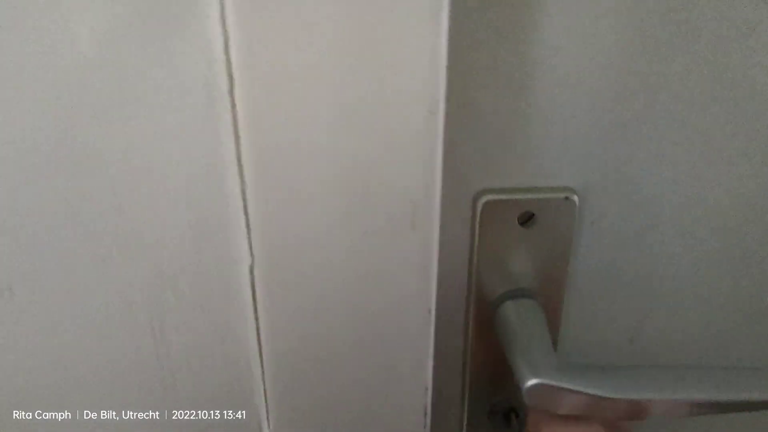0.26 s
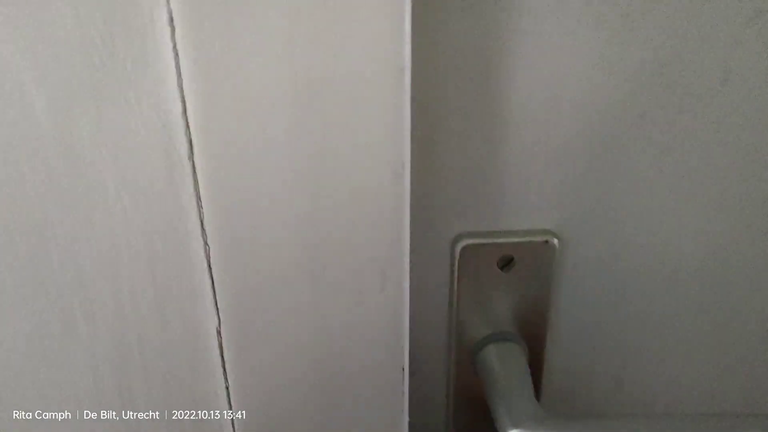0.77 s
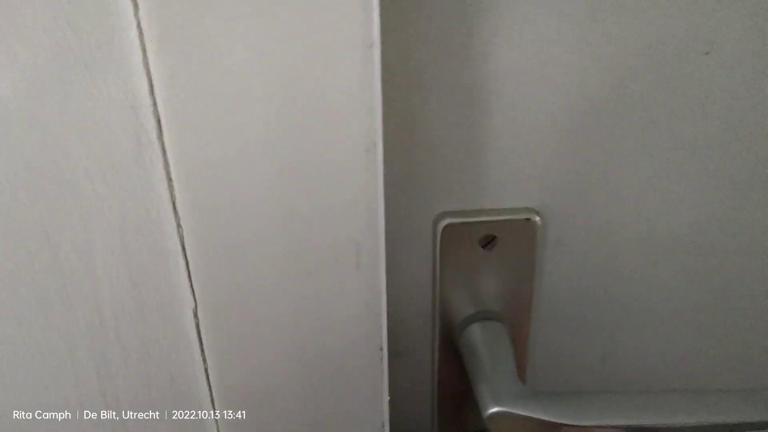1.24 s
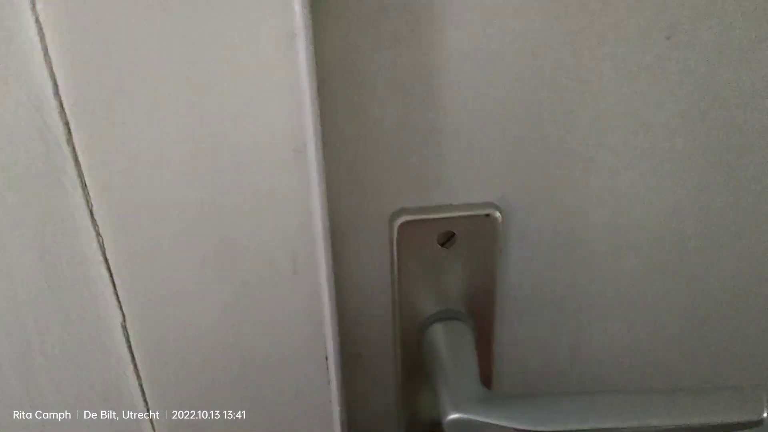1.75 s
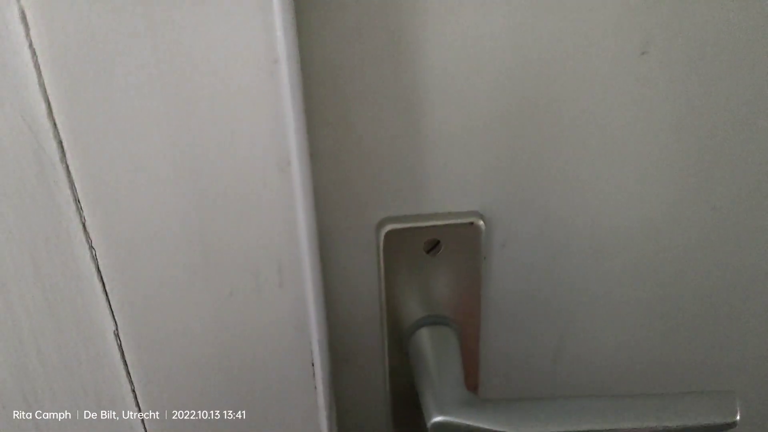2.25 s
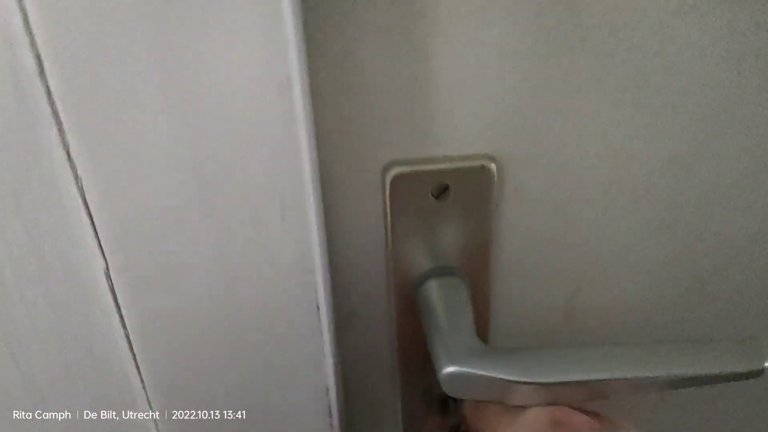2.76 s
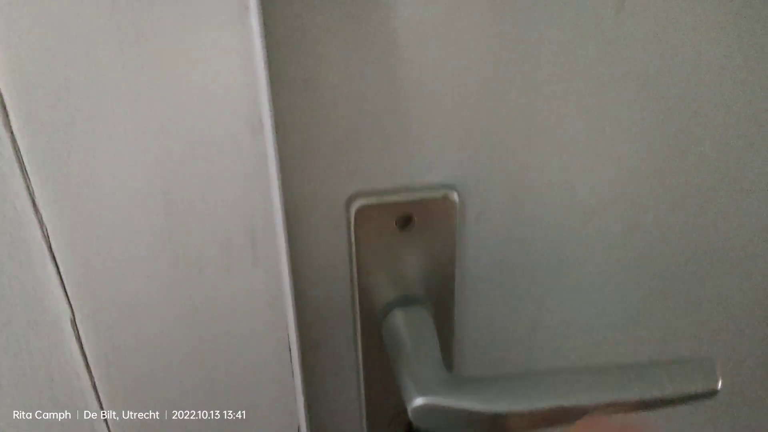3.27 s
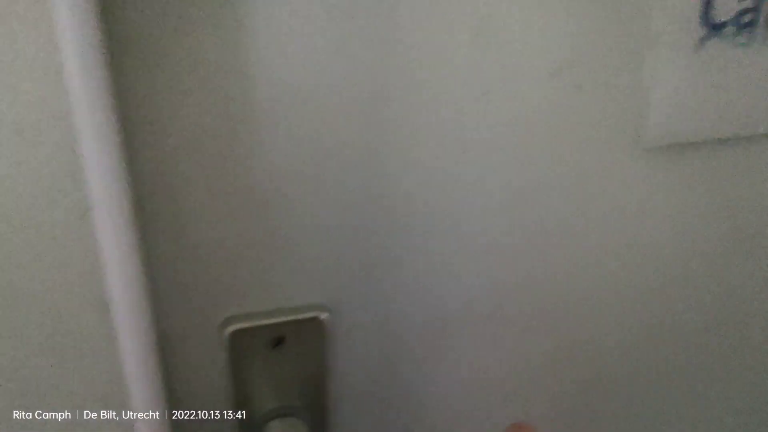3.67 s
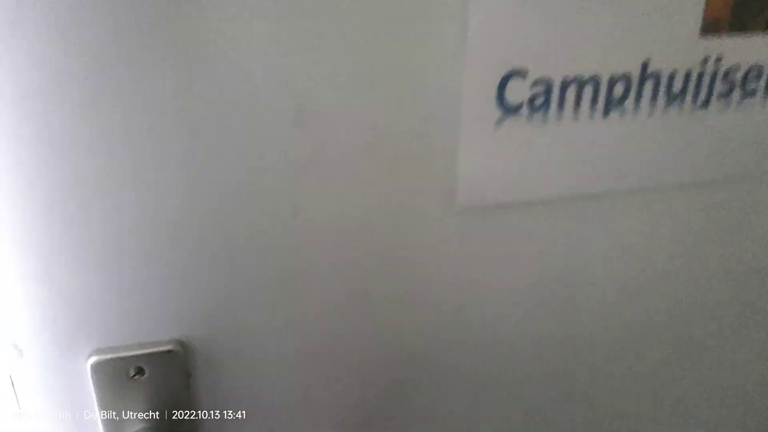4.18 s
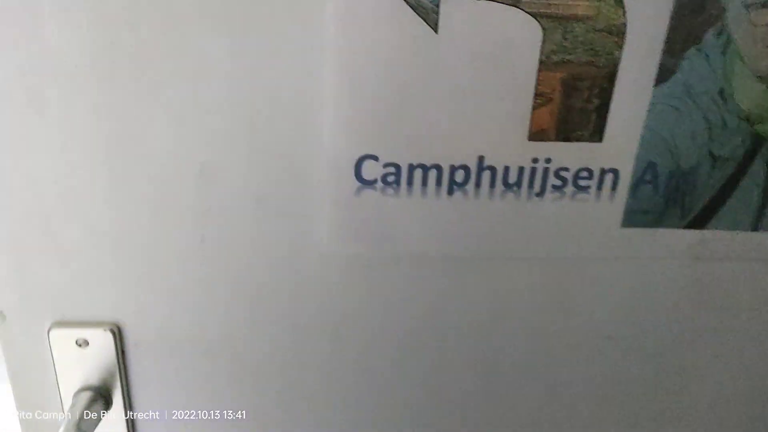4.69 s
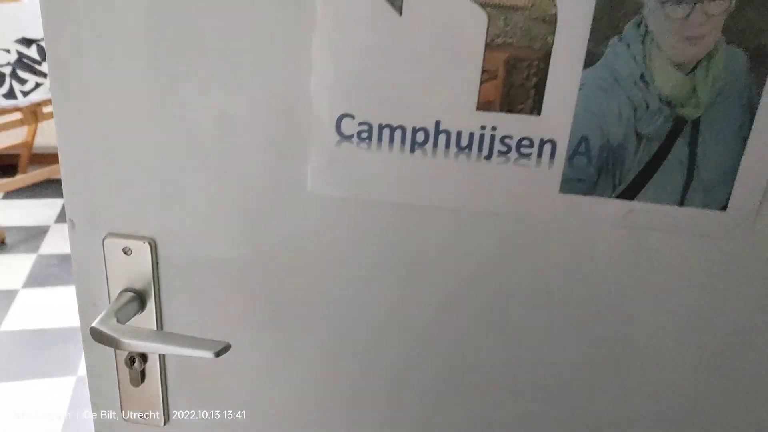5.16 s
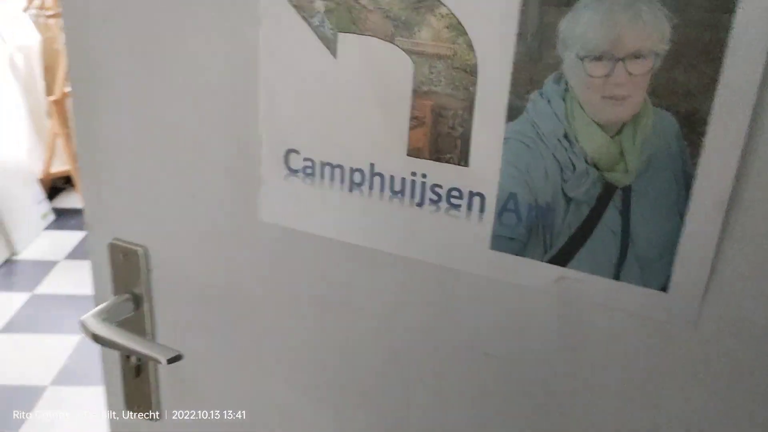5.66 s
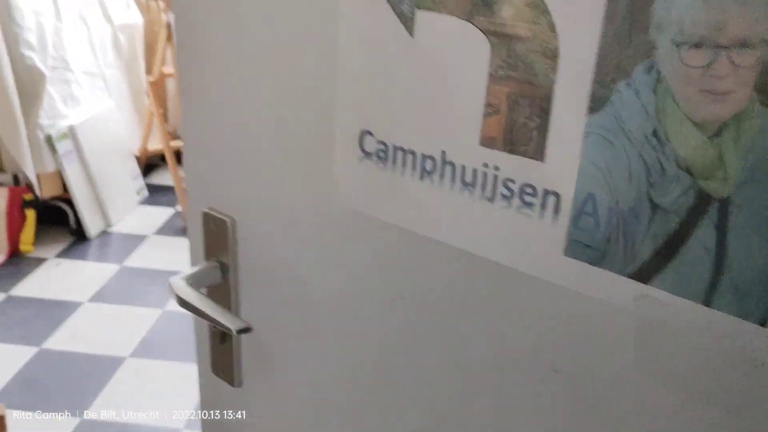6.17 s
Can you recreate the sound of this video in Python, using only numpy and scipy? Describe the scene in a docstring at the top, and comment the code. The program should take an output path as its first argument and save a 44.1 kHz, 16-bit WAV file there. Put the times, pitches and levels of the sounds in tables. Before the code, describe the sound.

Close-up clatter of a bunch of keys and a lock bolt snapping, dull knocks in a wooden door leaf, then lighter, fading key clinks.

```python
"""Small hard-walled hall: a hand turns a key in a door lock, presses the handle and pushes the door open.
Lock parts click and slide: noise cracks with a short ping. Knocks ring the modes of the door leaf.
The bunch of keys clinks: ticks set off dying, beating modes. The hand scrapes: clumped slips strike grains.
Sparse decaying taps give the echo; coloured noise and two low tones give the hush and hum of the building."""
import sys
import numpy as np
from scipy import signal
from scipy.fft import rfft, irfft, next_fast_len
from scipy.io import wavfile
from scipy.ndimage import uniform_filter1d

SR = 44100
rng = np.random.default_rng(int(sys.argv[2]) if len(sys.argv) > 2 else 0)


def volts(x):
    """Linear amplitude factor 10**(x/20) for a level x in dB, scalar or array-like."""
    e = np.asarray(x, float) / 20
    return 10 ** e


def materialize(psi):
    """Save the field psi as 16-bit PCM at rate SR to the path in sys.argv[1].

    A 1-D psi becomes a single channel; in a 2-D psi each row is a channel.
    """
    bounded = np.clip(np.atleast_2d(psi).T, -1, 1)
    quanta = np.round(bounded * 32767).astype(np.int16)
    wavfile.write(sys.argv[1], SR, quanta)


N = 283563
OPEN_S = 3.77  # the door starts to open


def evened(x):
    """Scales to rms 1."""
    return x / np.sqrt(np.mean(x ** 2) + 1e-20)


def read(points, hz):
    """Reads a curve on a log-frequency axis."""
    f, value = np.transpose(points)
    return np.interp(np.log(hz + 1), np.log(f + 1), value)


def coloured(x, db_at):
    """Filters along the last axis by a dB rule of frequency."""
    size = next_fast_len(x.shape[-1])
    gain = volts(db_at(np.fft.rfftfreq(size, 1 / SR)))
    return irfft(rfft(x, size) * gain, size)[..., :x.shape[-1]]


def sides(pan_db):
    """Gains of the two microphone ports, at most 9 dB apart."""
    return volts(np.clip(pan_db, -9, 9) * np.array([[.5], [-.5]]))


def add(mix, s, sound):
    """Mixes a two-channel sound in at a time."""
    part = mix[:, max(round(s * SR), 0):][:, :sound.shape[1]]
    part += sound[:, :part.shape[1]]


def ring(modes, strength, phase_cycles, seconds, rise_s):
    """Sum of exponentially dying sines, one per mode, each with its own strength and phase."""
    hz, db, t60_s = np.transpose(modes)[:, :, None]
    t = np.arange(round(seconds * SR)) / SR
    envelope = strength * volts(db - 60 * t / np.maximum(t60_s, .01))
    waves = envelope * np.sin(2 * np.pi * (hz * t + phase_cycles))
    return waves.sum(-2) * (1 - np.exp(-t / rise_s))


def crack(noise, t60_s, same, rise_s):
    """A burst of noise dying fast, partly alike at the two ports."""
    t = np.arange(noise.shape[1]) / SR
    pair = np.array([noise[0], same * noise[0] + np.sqrt(1 - same ** 2) * noise[1]])
    return pair * volts(-60 * t / t60_s) * (1 - np.exp(-t / rise_s)) ** 2


# spectrum of the hush: (frequency [Hz], level [dB per Hz])
AIR_SPECTRUM = [(15, -40.5), (25, -23.5), (114, -20), (195, 8), (373, -13.5), (754, -10.5), (1940, -15.5),
                (3720, -18), (6740, -50.5), (7920, -37.5), (10100, -40), (13200, -66.5), (16000, -55)]
# left-right likeness of the hush: (frequency [Hz], correlation [0..1])
AIR_LIKENESS = [(60, 0.52), (300, 0.24), (1000, 0.28), (8000, 0.11)]


def air():
    """The building's hush, most alike at both ports in the bass, and a faint, slowly throbbing low hum."""
    hush_db, hum_db, hum_hz, beat_hz = -58.5, -72, 79.8, 2.4
    opening_s, shut_db = 0.6, 0.5
    a, b = rfft(rng.standard_normal((2, N)))
    hz = np.fft.rfftfreq(N, 1 / SR)
    same = read(AIR_LIKENESS, hz)
    pair = np.array([a, same * a + np.sqrt(1 - same ** 2) * b])
    hush = irfft(volts(read(AIR_SPECTRUM, hz)) * pair, N)
    t = np.arange(N) / SR
    hum = np.sin(2 * np.pi * hum_hz * t) + 2.85 * np.sin(4 * np.pi * hum_hz * t)
    hum *= 1 + 0.13 * np.cos(2 * np.pi * beat_hz * (t - 4.5))
    # the shut door muffles the hush of the room behind it
    shut = 1 - np.clip((t - OPEN_S) / opening_s, 0, 1)
    muffled = coloured(hush, lambda f: -shut_db * (f > 500))
    return volts(hush_db) * (shut * muffled + (1 - shut) * hush) / hush.std() + volts(hum_db) * hum


def slips(per_s, spread_db, clumps):
    """Sparse impulses of uneven size and sign, denser in the clumps."""
    size = volts(spread_db * np.minimum(rng.exponential(1, N), 5)) * rng.choice([-1., 1.], N)
    return size * (rng.random(N) < per_s * clumps / SR)


def aftermath(blows, below_db, t60_s):
    """A level that jumps at every blow and dies away."""
    kicks = np.zeros(N)
    for s, db, *_ in blows:
        kicks[round(s * SR)] = volts(db + below_db)
    return signal.lfilter([1], [1, -volts(-60 / t60_s / SR)], kicks)


def chimes(effort, clumps):
    """Light touches, each sounding one of the keys' modes or one of 30 randomly placed treble tones."""
    treble = [(hz, -5.5, .15) for hz in rng.uniform(7500, 15500, 30)]
    tones = [ring([(hz, db, min(t60_s, 0.16))], 0.24, rng.random((2, 1, 1)), 0.16, 0.00023)
             for hz, db, t60_s in sum(KEY_MODES, treble)]
    touches, out = effort * slips(700, 4.1, clumps), np.zeros((2, N))
    for at in np.flatnonzero(touches):
        add(out, at / SR, touches[at] * tones[rng.integers(len(tones))])
    return out


# the hand at work: (time [s], level of key and hand scrape [dB], level of door rumble [dB])
HAND_LEVELS = [(0, -65.5, -38.5), (.22, -74, -72.5), (.27, -81, -40), (.35, -77, -44.5), (.43, -70, -42.5),
               (.654, -42.5, -43), (.95, -56.5, -50.5), (1.2, -48, -48.5), (1.56, -49.5, -50.5),
               (1.66, -43, -47.5), (1.78, -51, -47.5), (1.912, -63, -49.5), (2.15, -53, -69.5),
               (2.6, -68.5, -76), (3.05, -74.5, -67), (3.32, -55.5, -61), (3.6, -55, -53), (4.25, -50, -53),
               (4.6, -63.5, -88), (5, -63.5, -59.5), (5.55, -60, -63), (5.65, -74, -68),
               (5.85, -59.5, -60.5), (6.1, -69, -85), (6.43, -59, -50)]
# colour of the scrape: (frequency [Hz], level [dB per Hz])
SCRAPE_SPECTRUM = [(290, -11.5), (500, -5), (1800, -11), (3260, -8), (5700, -9.5), (6590, -12.5),
                   (7300, -11), (7700, -44), (9360, -27.5), (15800, -120)]


def scraping():
    """Tiny slips in clumps strike pitched grains, over a hiss, with faint chimes."""
    rattle_db, rattle_t60_s = -26.5, 0.25  # what a blow leaves in the loose parts
    s, scrape_db, _ = np.transpose(HAND_LEVELS)
    smooth = uniform_filter1d(uniform_filter1d(rng.standard_normal(N), 200), 200)
    clumps = volts(9.0 * evened(smooth))
    clumps /= clumps.mean()
    grains = np.zeros((2, N))
    for hz in np.geomspace(1300, 7000, 20) * rng.uniform(0.902, 1.168, 20):
        grain = ring([(hz, 0, 4.8 / hz + .003)], 1, rng.random((2, 1, 1)), .03, 0.000095)
        grain *= volts(read(SCRAPE_SPECTRUM, hz)) * np.sqrt(hz) / np.linalg.norm(grain)
        grains += signal.oaconvolve(slips(130, 4.04, clumps)[None], grain)[:, :N]
    hiss = coloured(rng.standard_normal((2, N)), lambda f: read(SCRAPE_SPECTRUM, f))
    hiss = np.sqrt(0.46 + clumps) * hiss
    effort = volts(np.interp(np.arange(N) / SR, s, scrape_db))
    effort = effort + aftermath(CLICK_BLOWS + SLIDE_BLOWS, rattle_db, rattle_t60_s)
    scrape = effort * (evened(grains) + volts(2.0) * evened(hiss))
    return scrape + volts(-3.5) * chimes(effort, clumps)


def rumbling():
    """A dull shake of the handled leaf: noise through its middle modes, stirred up by each knock."""
    shake_db, shake_t60_s = -34.5, 0.89
    s, _, rumble_db = np.transpose(HAND_LEVELS)
    modes = ring(LEAF_MODES[3:11], 1, 0, 0.12, 0.0091)
    shake = signal.oaconvolve(rng.standard_normal(N), modes)[:N]
    level = volts(np.interp(np.arange(N) / SR, s, rumble_db)) + aftermath(KNOCKS, shake_db, shake_t60_s)
    return level * evened(shake)


# decay of the hall: (frequency [Hz], t60 [s])
HALL_T60 = [(100, 0.13), (500, 0.51), (2000, 0.3), (6000, 0.13), (14000, 0.54)]


def hall(x):
    """Echo: sparse taps of random sign, one in every 20 samples, each band dying at its own speed."""
    taps = np.zeros((2, SR))
    at = np.arange(200, SR - 20, 20) + rng.integers(0, 20, (2, (SR - 201) // 20))
    np.put_along_axis(taps, at, rng.choice([-1., 1.], at.shape), 1)
    hz, t, z = signal.stft(taps, SR, nperseg=256)
    decay = volts(-60 * t / read(HALL_T60, hz)[:, None])
    tail = signal.istft(z * decay, SR, nperseg=256)[1]
    echo = signal.fftconvolve(x.mean(0)[None], tail / np.linalg.norm(tail[0]), axes=1)[:, :N]
    return coloured(echo, lambda f: -9 * (f > 7500))  # echo lowered by 9 dB above 7.5 kHz


def metal_blows(blows, rise_s, t60_s):
    """Each blow is a short crack round its centre pitch, a few bounces, and a brief ping of the part hit."""
    out, lead = np.zeros((2, N)), 64  # samples ahead of the blow
    ping_cycles, ping_max_s, ping_db = 60, .022, 5
    for s, db, hz, pan_db in blows:
        noise, phase, contact = rng.standard_normal((4, 4096)), rng.random((2, 1, 1)), rng.random(4096)
        # each contact lasts about a millisecond
        bounces = signal.lfilter([1], [1, -.97], contact < 180 / SR)
        # heavier parts meet more slowly and sound longer; louder blows count as heavier
        mass = volts(0.13 * (db + 21.5))
        burst = crack(noise[:2], t60_s * mass, 0.29, rise_s * mass)
        burst += volts(3.5) * bounces * crack(noise[2:], 0.022, 0.2, max(0.0006, rise_s))
        narrowness = np.clip(14 / mass ** 4, 7, 17)  # dB per octave squared

        def bell(f):
            return -np.minimum(narrowness * np.log2((f + 20) / hz) ** 2, 40) - 16 * (f > 7400)

        click = coloured(np.pad(burst, ((0, 0), (lead, 0))), bell)
        click /= np.sqrt(uniform_filter1d(click ** 2, size=176).mean(0).max())  # loudest 4 ms to rms 1
        ping = [(hz, ping_db - 2.4 * max(mass - 1, 0) / 0.57, min(ping_cycles / hz, ping_max_s))]
        click[:, lead:] += ring(ping, 1.0, 0.51 * phase, 4096 / SR, rise_s)
        add(out, s - lead / SR, volts(db - 10.0) * sides(pan_db) * click)
    return out


SNAP = dict(rise_s=0.00018, t60_s=0.013)  # both scaled by mass in the crack
# small metal parts of lock, latch and keys meeting: (time [s], level [dB], centre [Hz], left-right [dB])
CLICK_BLOWS = [(.142, -39, 3840, -1), (.247, -20.5, 2630, 9), (.3356, -41, 3280, 3), (.376, -36.5, 2420, 3),
               (.401, -36, 3180, -11), (.447, -17.5, 3020, 4), (.506, -28, 3620, 10),
               (.558, -28.5, 2040, 15), (.584, -25, 5100, 15), (.614, -26, 3160, 10),
               (0.634, -30, 1370, 12.5), (.642, -31, 5900, 12), (0.705, -15, 5600, -1),
               (.718, -24, 3000, 13), (.779, -23, 3480, 13), (.83, -26.5, 3970, 11.5),
               (.876, -38, 4800, 15), (.906, -31, 3400, 11), (0.99, -23.5, 3360, 6),
               (1.018, -23.5, 3170, 15), (1.071, -21, 2970, 4), (1.08, -21.5, 2680, -1),
               (1.0994, -47, 2870, -4), (1.125, -35, 840, 1), (1.128, -34, 2470, 11),
               (1.161, -39, 5400, 1.5), (1.187, -25, 2160, 2), (1.2102, -3.5, 2510, 6.5),
               (1.328, -19.5, 890, 16), (1.329, -25.5, 2960, 13.5), (1.3394, -40, 4080, 12.5),
               (1.3803, -29.5, 2950, 14), (1.4217, -27, 6000, 4), (1.438, -23, 5550, 14.5),
               (1.472, -19, 970, 21), (1.61, -26.5, 6740, 0), (1.672, -45.5, 3500, 15),
               (1.703, -28, 4500, 3), (1.718, -34, 3240, 9), (1.739, -27, 4530, 10), (1.794, -39, 2470, 4),
               (2.112, -23.5, 2740, 3.5), (2.242, -12, 930, -4), (2.243, -7, 5160, -2.5),
               (2.43, -13, 815, 19), (2.431, -13.5, 3530, -8), (2.551, -25.5, 1570, 1),
               (2.566, -28, 2830, -7), (2.87, -46.5, 3700, 9), (2.881, -55, 910, -15),
               (2.93, -54, 4430, -4.5), (2.938, -47.5, 1180, -17), (2.939, -59, 4500, -5),
               (2.987, -41, 4220, 20), (3.129, -39.5, 3040, 2), (3.209, -20.5, 2340, -17.5),
               (3.224, -23, 2540, 12), (3.255, -36.5, 2480, -2), (3.335, -27.5, 3190, 12),
               (3.37, -48, 3680, 21), (3.438, -33.5, 4150, 18), (3.518, -37.5, 2930, 5),
               (3.621, -16, 6800, 0), (3.704, -32, 1170, -3), (3.738, -29, 2930, 10.5),
               (3.797, -44, 6300, 8), (3.817, -35, 6860, 9.5), (3.9, -17, 924, -11.5),
               (3.901, -21.5, 3700, 7), (3.939, -32, 6800, 4), (4.009, -11.5, 866, -3.5),
               (4.01, -16.5, 2130, 3), (4.16, -29, 3240, 15), (4.209, -32.5, 2604, 11),
               (4.278, -38, 5740, 23), (4.304, -24.5, 4600, 4), (4.571, -37, 3320, 23),
               (4.616, -38, 3230, 11), (4.697, -32.5, 6540, 22), (4.7744, -44, 5900, 20),
               (4.779, -31.5, 4270, 25.5), (4.793, -54, 4300, 9), (4.801, -47, 4500, 9),
               (4.81, -64, 4400, 7), (4.857, -49, 5000, 11), (4.874, -25, 5460, 8), (4.894, -24, 5450, 18),
               (4.923, -35, 5570, 5), (4.9344, -46, 5520, -1), (5.008, -37, 5570, -14),
               (5.076, -36, 5630, -2), (5.106, -36.5, 6360, 19), (5.165, -32, 4720, 9),
               (5.203, -34.5, 7400, 26), (5.272, -36.5, 6360, 2), (5.284, -44, 3900, 10),
               (5.376, -34.5, 5600, 24), (5.402, -29.5, 5650, 10), (5.5, -36.5, 2640, 3),
               (5.55, -36.5, 2570, 1), (5.589, -34.5, 3480, 7), (5.601, -53, 4700, 9),
               (5.6204, -39, 5330, 8), (5.626, -26, 5640, -18), (5.66, -35, 5300, -2),
               (5.695, -33, 5350, 12), (5.7014, -32, 5560, -4), (5.71, -32.5, 2900, 8),
               (5.736, -35, 4370, 5), (5.75, -40, 4900, 10), (5.776, -45, 3800, 9), (5.815, -42, 5200, -6),
               (5.866, -45, 6800, -8), (5.9, -44, 3050, 7), (5.992, -40, 3100, 12), (6.025, -40, 3080, 3),
               (6.052, -38, 6370, 16), (6.133, -42.5, 3580, 12), (6.26, -41.5, 7200, -3),
               (6.293, -27, 6760, 27), (6.355, -35.5, 2700, 10), (6.398, -36, 7000, -11)]


def clicks():
    """Small metal parts snap together."""
    return metal_blows(CLICK_BLOWS, **SNAP)


def swinging(t):
    """The ring of a dangling key swells and fades, at each port in its own step."""
    depth, beat_hz = 0.39, rng.uniform(7.56, 35.56)
    turn_cycles = rng.uniform(0, 0.15, (2, 1))
    return 1 + depth * np.cos(2 * np.pi * (beat_hz * t + turn_cycles))


# keys meeting: (time [s], tick level [dB], keys a-g set ringing, in listed order,
# ring level of the first [dB], loss to each next key [dB]; a negative loss makes the next key louder)
KEY_CONTACTS = [(0.245, -30, "cd", -73, 9), (0.448, -26, "dcb", -67, 1), (0.509, -24.5, "bc", -40, 11),
                (.5817, -41, "cab", -77, 2), (0.616, -23, "bacd", -64, 1), (0.673, -42, "ac", -43, 9),
                (0.707, -41, "acd", -18.5, 7), (.736, -55, "ae", -16.5, -5), (0.757, -56, "aec", -16.5, 2),
                (0.83, -47, "ad", -34, 1), (0.849, -47, "g", -34, 0), (0.904, -49, "g", -35, 11),
                (1.019, -32, "bec", -18, 11), (1.138, -36, "cd", -33.5, 15),
                (1.2075, -4.5, "dcab", -49.5, 8), (1.347, -26.5, "bac", -58, 13),
                (1.422, -21, "acdb", -52, 10), (1.441, -26, "cadb", -34, 8),
                (1.479, -42, "acdb", -27.5, 4.5), (1.577, -50.5, "ca", -26, 22),
                (1.614, -24, "ac", -34, 19), (1.653, -42, "ebc", -24, 10), (1.673, -21.5, "cdb", -35, 17),
                (1.704, -30, "cdba", -16, 12.5), (1.742, -47, "ef", -26.5, 6), (1.865, -30, "cbd", -41, 4),
                (2.028, -41, "ba", -44.5, 22), (2.099, -32, "abcd", -56, 4.5),
                (2.227, -32, "adbc", -42.5, 14), (2.242, -5, "dacb", -29, 5),
                (2.4306, -13.5, "adb", -44, 15), (2.47, -26, "cdb", -48, -5.5),
                (2.621, -38, "cb", -43.5, 16), (3.047, -28, "bc", -69, 9), (3.125, -50, "ba", -43, 25),
                (3.2066, -27, "cdb", -38, 8), (3.384, -23, "bcad", -43, 2.5), (3.456, -24.5, "cd", -37, 6),
                (3.62, -2, "bacd", -11.5, 15.5), (3.795, -29, "adbc", -42, 7),
                (3.8179, -41, "badc", -27, 4), (3.862, -56, "ecd", -17.5, 5), (3.934, -40, "ac", -26.5, 8),
                (4.006, -11.5, "cbda", -32, 3.5), (4.162, -18, "bc", -26, 9), (4.277, -19, "fcd", -36, 4),
                (4.41, -30, "bc", -39, 20), (4.573, -27, "bda", -38, 25), (4.694, -22, "cd", -69, 4),
                (4.777, -25, "acd", -31.5, 9), (4.809, -49, "a", -45, -3), (4.858, -29.5, "bca", -44, 7),
                (4.8951, -14.5, "fdbc", -27, 11), (4.9159, -37, "cfb", -27.5, 4),
                (5.075, -29, "dbc", -33, 15), (5.168, -27, "abc", -64, 1), (5.202, -31, "acb", -41.5, -0.5),
                (5.272, -26, "ecd", -42, 4), (5.373, -29, "bc", -49, 9), (5.606, -55, "cbd", -34, 5),
                (5.6184, -32, "f", -31, 12), (5.627, -15, "fcab", -25, 8.5), (5.694, -26, "fc", -34, 9),
                (5.75, -45, "af", -43, 4), (5.8155, -29, "abc", -40.5, -2), (5.866, -29, "a", -54, -2),
                (5.9834, -31, "cbd", -46, 2), (6.2334, -35, "cad", -45, 3.5),
                (6.2934, -21, "cdba", -29.5, 3)]
# modes of each key: (frequency [Hz], level [dB], t60 [s])
KEY_MODES = [
    [(6785, 0, .5), (12030, -10, .3), (6240, -24, .3), (11410, -20, .3), (9640, -26, .2)],
    [(9990, 0, .13), (3200, -7, .09), (14120, -4, .1), (15400, -13, .25), (10350, -16, .2), (8020, -22, .3),
     (8480, -20, .1)],
    [(14390, 0, .26), (15260, -5, .15), (13770, -4, .12), (11165, -5, .22), (8312, -14, .3)],
    [(10150, 0, .4), (9000, -12, .2), (12900, -14, .15)],
    [(7241, 0, .12), (2500, -20, .05)],
    [(5500, 0, .07), (1920, -7, .07), (3720, -10, .05)],
    [(3200, 0, .25), (6240, -8, .3), (8500, -12, .2), (12030, -8, .3)],
]
# per key: left-right [dB]
KEY_PAN_DB = [5.5, 8.5, 3.5, 1, 9, -2, 11]
# per key: lead of the left port [cycles at 10 kHz]
KEY_LEAD_CYCLES = [0.29, 0.11, 0.35, 0.28, 0.14, 0.081, 0.13]
# per key: longest free swing before it brushes a neighbour [s]
KEY_SWING_S = [0.087, .2, 0.17, .25, 0.11, .1, .12]


def clinks():
    """A bright tick sets keys ringing until a contact damps them; mode phases differ between ports."""
    out, t = np.zeros((2, N)), np.arange(SR // 4) / SR
    pull, swell_s, soft_db = 0.0045, .012, -41  # pull: pitch range of a touch [ratio]
    contacts = np.sort([row[0] for row in KEY_CONTACTS + SLIDE_BLOWS] + [N / SR])
    for s, db, names, ring_db, loss_db in KEY_CONTACTS:
        free_s = contacts[contacts > s + .025][0] - s
        tick = crack(rng.standard_normal((2, 1024)), 0.025, 0.22, 0.00057)
        tick = coloured(tick, lambda f: -30.0 * (f < 7000) - 60 * (f > 15900))
        add(out, s, volts(db - 11.0) * tick)
        rise_s = 0.0003 if db > soft_db else swell_s  # keys that only brush swell into their ring
        for place, k in enumerate(map("abcdefg".index, names)):
            modes = np.array(KEY_MODES[k])
            share, phase = rng.random((2, 2, len(modes), 1))
            share[:, :2] *= .2  # the first two modes vary least
            damping = volts(-500 * np.maximum(t - min(free_s, KEY_SWING_S[k]), 0))
            damping = damping * np.minimum(1, 20 * (t[-1] - t))
            # the phase gap between the ports grows with pitch
            lead = KEY_LEAD_CYCLES[k] * np.array([[[1]], [[0]]])
            phase = phase[0] + modes[:, :1] / 10000 * (0.5 * phase + lead)
            pulled = modes * np.array([1 + pull * (share[0, -1, 0] - .5), 1, 1])
            tone = ring(pulled, volts(-9.0 * share), phase, len(t) / SR, rise_s)
            level = volts(ring_db - place * loss_db - 7.0) * sides(KEY_PAN_DB[k])
            add(out, s, level * damping * swinging(t) * tone)
    return out


# knocks into the door leaf: (time [s], level [dB], centre [Hz])
KNOCKS = [(0.246, -27, 191), (.29, -37, 206), (0.324, -38.5, 290), (.365, -47, 265), (0.409, -25, 255),
          (0.446, -20.5, 206), (0.459, -28.5, 186), (0.716, -25, 189), (0.816, -22.5, 194.5),
          (1.077, -23.5, 249), (1.207, -11.5, 633), (1.544, -32, 266), (1.641, -42, 207),
          (1.86, -24.5, 250), (2.122, -21, 217), (2.242, -15.5, 265), (2.246, -8, 396), (2.281, -17, 400),
          (2.404, -21.5, 235), (2.422, -9.5, 760), (2.549, -28, 194), (2.769, -32, 199),
          (3.049, -18.5, 233), (3.208, -16.5, 192), (3.222, -25, 159), (3.481, -29, 153), (3.616, -29, 223),
          (3.697, -28.5, 193), (3.86, -15.5, 294), (3.897, -11, 156.6), (4.007, -14.5, 204),
          (4.013, -14, 108), (4.236, -33, 200), (4.326, -16.5, 266.5), (4.35, -20.5, 326),
          (5.665, -38, 186), (6.27, -22.5, 256.4), (6.287, -17, 122)]
# modes of the door leaf: (frequency [Hz], level [dB], t60 [s])
LEAF_MODES = [(62, -9, .2), (108, -2, .25), (122, 1, .25), (152, 0, .3), (188, -5, .25), (206, -1, .4),
              (237, -5, .25), (265, -2, .26), (323, -4, .18), (385, -5, .17), (410, -7, .18),
              (441, -6, .14), (505, -7, .14), (555, -7, .14), (603, -8, .14), (690, -9, .1), (755, -9, .1),
              (830, -8, .12), (905, -6, .14), (965, -9, .08), (1050, -10, .08)]


def thuds():
    """A knock pushes the leaf's modes, most those at the pitch set by where it lands, over a dull puff."""
    out, (modes_hz, modes_db, t60_s) = np.zeros((2, N)), np.transpose(LEAF_MODES)
    for s, db, hz in KNOCKS:
        share, phase, shift, grip = rng.random((4, len(LEAF_MODES)))
        away = np.log2(modes_hz / hz)
        near_db = -4 * share - 5 * away ** 2 + 11 * np.exp(-(away / .09) ** 2)
        # the grip shifts and damps the modes; the frame shortens them until the door opens
        held_hz = modes_hz * (1 + 0.02 * (shift - .5))
        held_t60_s = t60_s * (0.77 + 0.31 * grip) * (.7 if s < OPEN_S else 1)
        held = np.transpose([held_hz, modes_db + near_db, held_t60_s])
        ports = np.array([[-1], [1]]) * shift * modes_hz / 9000  # the ports part with pitch
        puff = crack(rng.standard_normal((2, 16384)), 0.068, 0.86, 0.0026)
        puff = coloured(puff, lambda f: -np.minimum(2.6 * np.log2((f + 20) / hz) ** 2, 60) - 6.6 * (f < 105))
        sound = ring(held, 0.22, (0.31 * phase + ports)[..., None], 16384 / SR, 0.0016)
        add(out, s, volts(db - 3.5) * (sound + volts(-3.5) * puff / abs(puff).max()))
    return out


# metal dragged over metal: (start [s], length [s], level [dB], centre [Hz])
DRAG_RUNS = [(0.397, 0.04, -33.5, 3400), (0.427, .024, -30.5, 3300), (0.61, 0.034, -49, 5330),
             (0.803, 0.022, -30, 3210), (1.322, 0.026, -43, 3550), (1.614, 0.033, -28.5, 3570),
             (1.65, 0.033, -25.5, 3500), (3.364, 0.038, -36, 4350), (4.01, 0.04, -43, 3050),
             (4.199, .05, -34, 3220), (4.911, 0.03, -27, 5000), (5.617, 0.033, -33, 4100),
             (5.747, 0.038, -33.5, 4260)]


def drags():
    """A quick run of uneven slips, scattered in time, pitch and strength."""
    blows = []
    for s, length_s, db, hz in DRAG_RUNS:
        for when, pitch, size in rng.random((12, 3)):
            blows.append((s + length_s * when, db - 15.0 * size, hz * (0.82 + 0.36 * pitch), 3.5))
    return metal_blows(blows, **SNAP)


# strikes of a longer key: (time [s], level [dB], loss of the low mode [dB])
LONG_KEY_STRIKES = [(0.72, -44, 9), (0.827, -36, 21), (1.4675, -35, 5), (1.702, -31.5, 2), (1.976, -51, 11),
                    (4.779, -60, 6), (5.205, -54, 15)]
# its modes: (frequency [Hz], level [dB], t60 [s])
LONG_KEY_MODES = [(4665, 0, .9), (2186, 0, .4)]


def long_key():
    """A longer key rings low and long, its level beating."""
    out, t = np.zeros((2, N)), np.arange(SR // 2) / SR
    for s, db, low_loss_db in LONG_KEY_STRIKES:
        phase = .25 * rng.random((2, len(LONG_KEY_MODES), 1))
        strength = 0.37 * volts([[0], [-low_loss_db]])
        tone = ring(LONG_KEY_MODES, strength, phase, len(t) / SR, 0.002)
        add(out, s, volts(db) * swinging(t) * tone * np.minimum(1, 5 * (t[-1] - t)))
    return out


# bolt and latch sliding home: (time [s], level [dB], centre [Hz], left-right [dB])
SLIDE_BLOWS = [(1.856, -17, 2530, 5.5), (2.1, -23.5, 2260, 5), (2.228, -7.5, 2650, 4),
               (2.399, -17, 2540, 4), (3.043, -21, 2560, 5), (3.857, -12.5, 5100, 3.5),
               (4.32, -15.5, 2420, 1)]


def slides():
    """Bolt and latch slide home: blows that build up over some milliseconds."""
    return metal_blows(SLIDE_BLOWS, rise_s=0.0088, t60_s=0.032)


def scene():
    """Lock, keys and hand close by, their echo in the hall, and the hush."""
    metal = clicks() + drags() + slides()
    door, keys = thuds(), clinks() + long_key()
    scrape, rumble = scraping(), rumbling()
    echo = hall(volts(-2.0) * metal + volts(0.5) * door + volts(-3.0) * keys + volts(-12.5) * scrape)
    return metal + door + keys + scrape + rumble + echo + air()


def low_pass(x):
    """Removes everything above the highest recorded frequency."""
    return signal.sosfilt(signal.butter(12, 16800, fs=SR, output="sos"), x)


def record(dry):
    """Two close ports: the difference is halved in the bass, the sum loses the deepest bass."""
    mid, side = dry.mean(0), (dry[0] - dry[1]) / 2
    mid = signal.sosfilt(signal.butter(2, 56, "high", fs=SR, output="sos"), mid)
    upper_side = signal.sosfilt(signal.butter(2, 450, "high", fs=SR, output="sos"), side)
    side = 0.51 * side + 0.56 * upper_side
    return low_pass(np.array([mid + side, mid - side]))


dry = scene()
out = record(dry)
materialize(out)
```